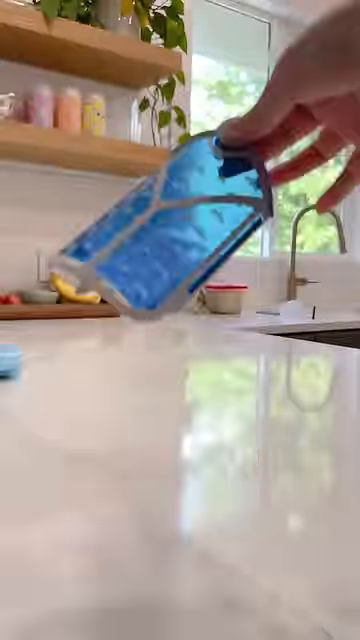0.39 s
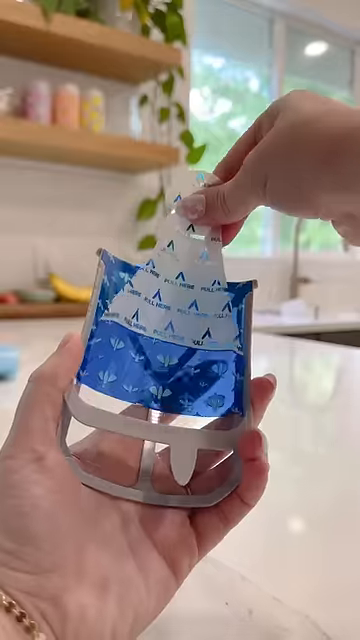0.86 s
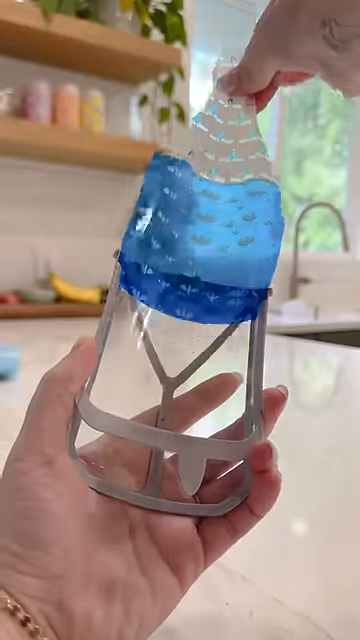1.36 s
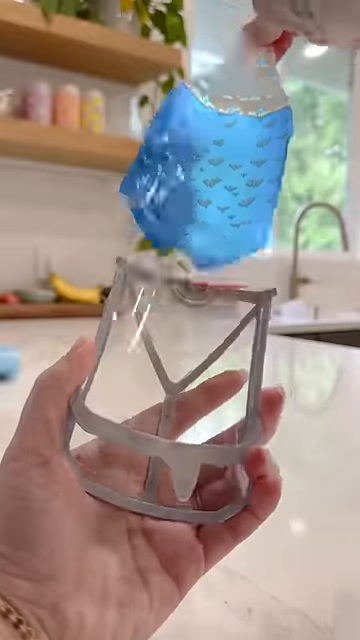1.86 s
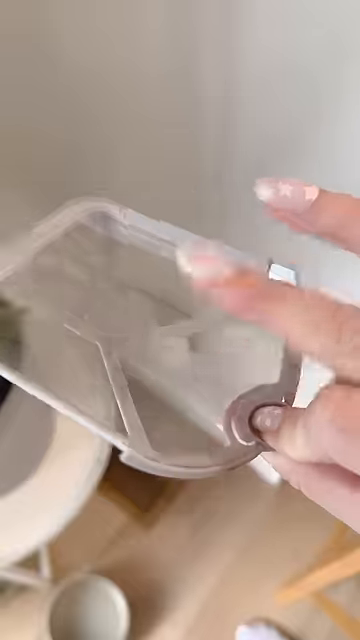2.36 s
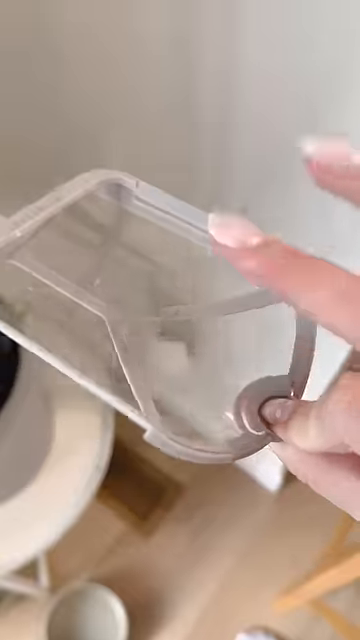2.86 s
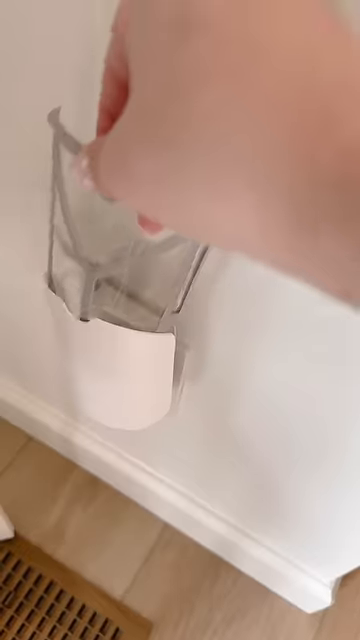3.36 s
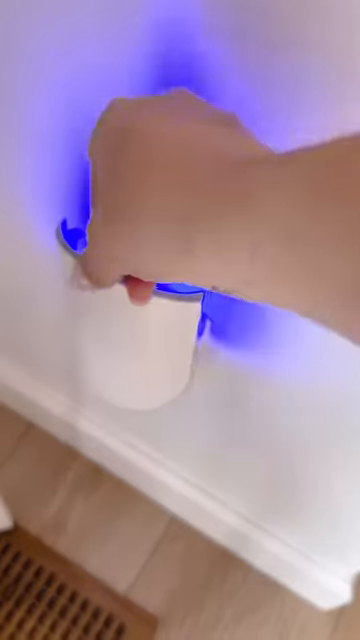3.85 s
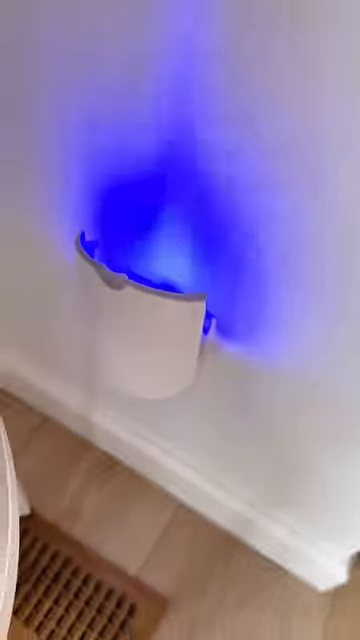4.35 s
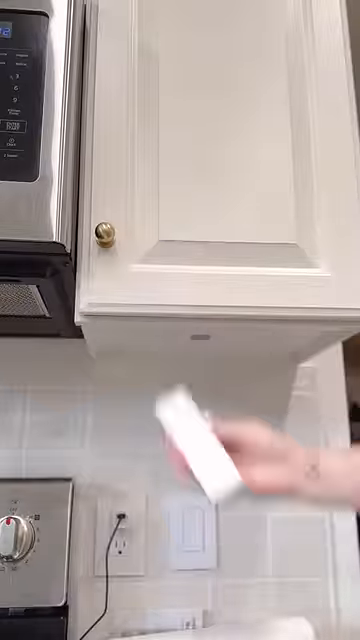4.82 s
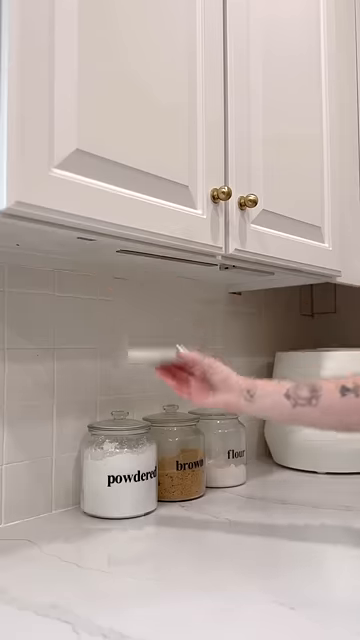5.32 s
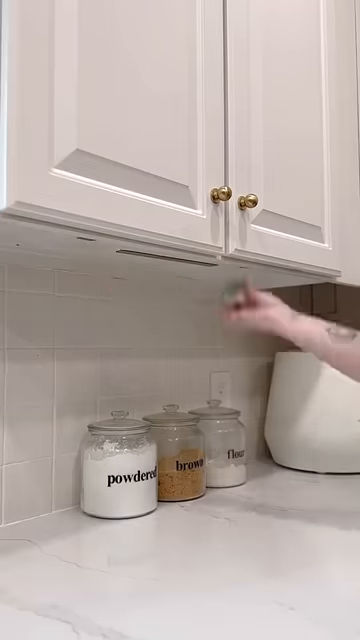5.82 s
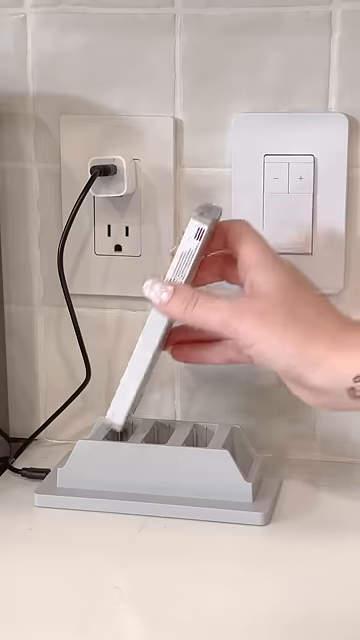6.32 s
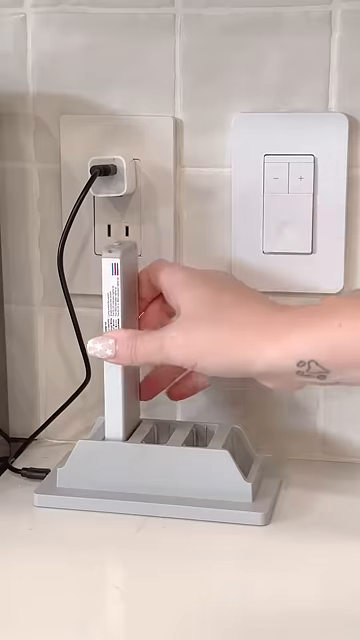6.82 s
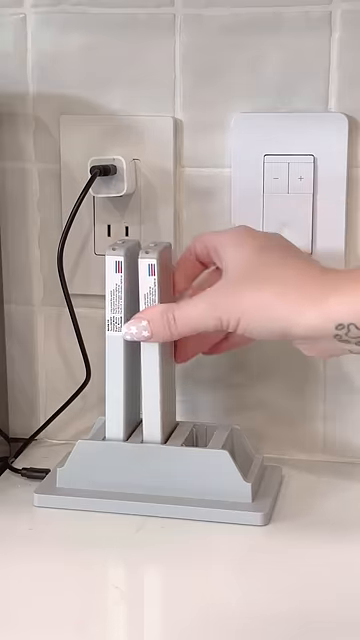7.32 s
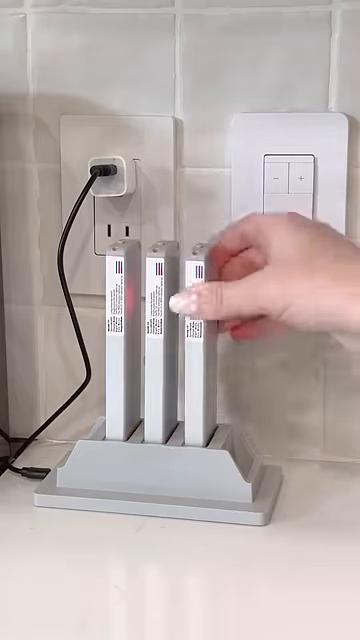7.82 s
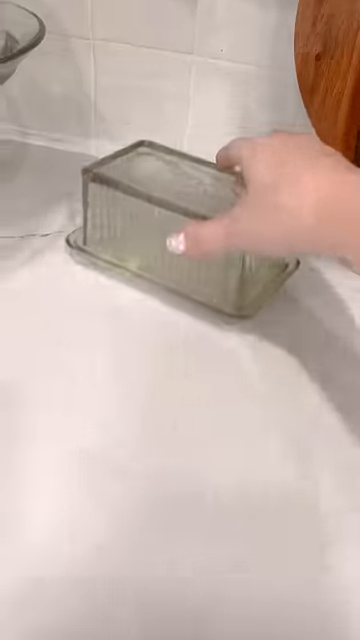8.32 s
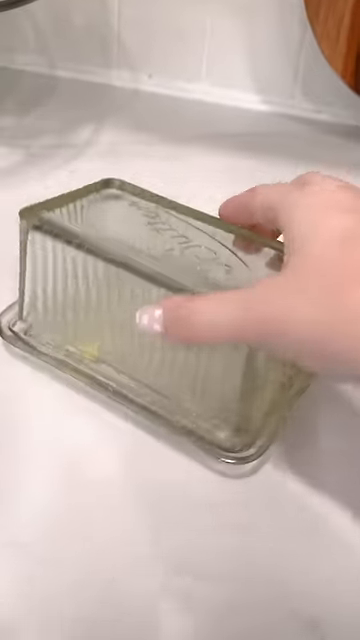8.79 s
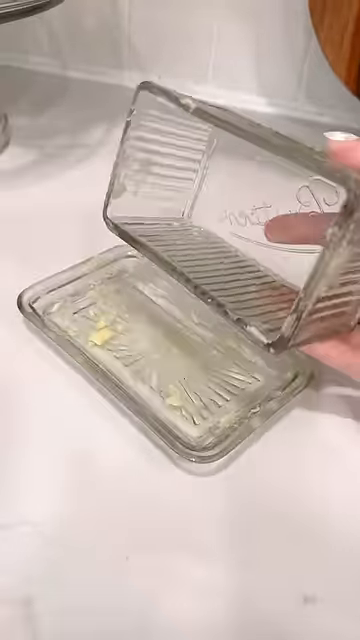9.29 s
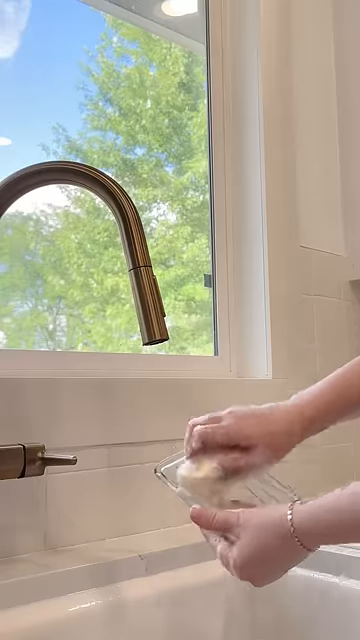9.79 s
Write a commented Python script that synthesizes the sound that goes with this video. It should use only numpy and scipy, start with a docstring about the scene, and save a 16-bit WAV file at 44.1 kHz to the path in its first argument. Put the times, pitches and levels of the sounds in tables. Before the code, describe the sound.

Close-miked in a hard-walled kitchen over quiet fridge hum and air that shift with each cut. A plastic tray rubs out of a card box, sticky film peels with crackles and snaps, and nails tap twice. The tray scrapes and squeaks into a wall holder. Bars snap off magnets, then click into a hollow ringing dock. A glass dish drags over stone and knocks, its lid clinks brightly, and a wet sponge rubs softly.

```python
"""Kitchen chores heard close by in short shots, over a fridge hum and air whose pitch follows each shot's speed.
A plastic tray slides out of a carton, its sticky film is peeled off, nails tap it and it slides into a wall holder.
Light bars are pulled off their magnets, two faint steady tones sound, and bars click into a hollow dock; a glass dish
drags over stone, knocks and its lid clinks; last, a wet sponge wipes. Contacts are noise bursts with ringing modes,
strokes are coloured noise full of tiny slips, squeaks are sines that mostly glide; hard walls answer with a wash."""
import sys
import numpy as np
from scipy import signal
from scipy.fft import rfft, irfft, next_fast_len
from scipy.io import wavfile
from scipy.ndimage import uniform_filter1d, map_coordinates

SR = 44100
rng = np.random.default_rng(int(sys.argv[2]) if len(sys.argv) > 2 else 0)


def level_to_linear(level):
    """Convert decibel levels to linear amplitude factors, elementwise."""
    exponent = np.asarray(level, float) / 20
    return 10 ** exponent


def transcribe(u):
    """Save the signal u as a 16-bit wav file named by the first command-line argument.

    u: samples, shape (n,) or (channels, n), limited to [-1, 1]; the rate is SR.
    q: integer samples, one column per channel.
    """
    v = np.clip(np.atleast_2d(u).T, -1, 1)
    q = np.round(v * 32767).astype(np.int16)
    wavfile.write(sys.argv[1], SR, q)


N = 437472
T = np.arange(N) / SR


def unit(x):
    """Scales a sound to rms 1."""
    return x / np.sqrt(np.mean(x ** 2) + 1e-20)


def along(points, hz):
    """Reads a curve of (frequency [Hz], value) points on a log frequency axis."""
    f, v = np.transpose(points)
    return np.interp(np.log(hz + 1), np.log(f + 1), v)


def filtered(x, response):
    """Multiplies the spectrum of x by a complex response of frequency."""
    m = next_fast_len(x.shape[-1] + 8192)
    spectrum = rfft(x, m) * response(np.fft.rfftfreq(m, 1 / SR))
    return irfft(spectrum, m)[..., :x.shape[-1]]


def causal(points):
    """Minimum-phase response of a spectrum: nothing sounds before the blow."""
    def response(hz):
        cepstrum = irfft(np.log(level_to_linear(np.maximum(along(points, hz), -90))))
        half = len(cepstrum) // 2
        cepstrum[1:half] *= 2
        cepstrum[half + 1:] = 0
        return np.exp(rfft(cepstrum))
    return response


def thud_body_edge(x):
    """Splits a sound into thud, body and edge; the three add up to the whole."""
    def band(hz, kind):
        return signal.sosfilt(signal.butter(2, hz, kind, fs=SR, output="sos"), x)
    thud, edge = band(700, "low"), band(4500, "high")
    return thud, x - thud - edge, edge


def wobble(rate):
    """A smooth random curve with rate knots a second."""
    return map_coordinates(rng.standard_normal(int(N * rate / SR) + 4), [T * rate])


def wavering(x, patchy_db):
    """The contact patch wanders, so narrow bands swell and fade for a moment."""
    z = signal.stft(x, nperseg=1024)[2]
    field = uniform_filter1d(rng.standard_normal(z.shape), size=4, axis=0)
    field = uniform_filter1d(field, size=5, axis=1)
    return signal.istft(z * level_to_linear(patchy_db * unit(field)), nperseg=1024)[1][:N]


def swells(rows, rise_db, fall_db, bend):
    """Level curves of short strokes, up and down; bend over 1 rounds the top, under 1 sharpens it."""
    u = np.linspace(0, 1, 8)

    def away(top, far, db, drop_db):
        return np.transpose([top + (far - top) * u, db - drop_db * u ** abs(bend)])

    return [np.vstack([away(top, start, db, rise_db)[::-1], away(top, end, db, fall_db)[1:]])
            for start, top, end, db in rows]


RISE_SHARE, SLOWEST_RISE_S = .08, .0015  # rise time as a share of contact length, and its limit


def strikes(hits, crack, modes, thud_db, ring_db, soft=0):
    """Each contact is a short coloured rattle; its weight thuds and rings the modes at new random strengths.
    soft: dB of thud gained for each dB of edge lost."""
    out, t = np.zeros(N + SR), np.arange(SR // 3) / SR
    s, db, weight, edge, length = np.transpose(hits)[:, :, None]
    hold_and_stop = level_to_linear(-60 * (t / np.maximum(length, .002)) ** 1.324)
    rise = 1 - np.exp(-t / np.clip(RISE_SHARE * length, .0001, SLOWEST_RISE_S))
    chatter = hold_and_stop * rise
    rattle = filtered(rng.standard_normal(chatter.shape) * chatter, causal(crack))
    # each band is brought to peak 1
    low, body, high = [x / np.abs(x).max(1, keepdims=True) for x in thud_body_edge(rattle)]
    sound = body + level_to_linear(weight + thud_db - soft * edge) * low + level_to_linear(edge) * high
    strength = rng.normal(0, 1.0, (len(s), len(modes)))
    for k, (hz, level, t60) in enumerate(modes):
        fade = level_to_linear(weight + ring_db + level + strength[:, k, None] - 60 * t / t60)
        build_up = 1 - np.exp(-t * hz / 1.3)  # within a cycle or so
        sound += fade * np.sin(2 * np.pi * hz * t) * build_up
    for at, row in zip(np.round(s[:, 0] * SR).astype(int), level_to_linear(db) * sound):
        out[at:at + len(t)] += row
    return out[:N]


USUAL_DB = -45  # pressure at which a stroke has its usual colour


def rubbing(strokes, colour, peaks, peak_db, slips, slip_db, rough_db, thud, edge):
    """Tiny slips of uneven size, slips a second, over a scrape in the rubbed thing's colour.
    thud and edge are (dB over the body, dB more per dB of pressure)."""
    size = level_to_linear(slip_db + rng.normal(0, 1.4, N)) * (rng.random(N) < slips / SR)
    scrape = wavering(rng.standard_normal(N), patchy_db=3.0)
    grit = scrape * (1 + 40 * uniform_filter1d(size, size=40)) * level_to_linear(rough_db * wobble(82))

    def coloured(f):
        ringing = 1 + sum(level_to_linear(peak_db + db) * 1j * f * w / (c * c - f * f + 1j * f * w) for c, w, db in peaks)
        return level_to_linear(along(colour, f)) * ringing

    bands = thud_body_edge(filtered(grit, coloured))
    # the loudest stroke at each moment sets the pressure; no sound outside strokes
    db = np.max([np.interp(T, *np.transpose(stroke), -200, -200) for stroke in strokes], 0)
    tilts = [db + over_db + grows * (db - USUAL_DB) for over_db, grows in (thud, (0, 0), edge)]
    gains = uniform_filter1d((db > -150) * level_to_linear(tilts), size=60)
    return sum(gain * unit(band) for gain, band in zip(gains, bands))


# shots: (start [s], playback speed [ratio], hum, 2nd and 3rd harmonic [dB before the lift], rumble [dB], hiss [dB])
SHOTS = [(0, 1, -62, -61.5, -66, -55.5, -68), (.455, 1.5, -58, -69, -65, -59, -70.5),
         (2.095, 1, -54, -65, -69, -57, -68.5), (4.401, 1, -62, -61.5, -65.5, -59.5, -66.5),
         (5.05, 1, -50, -65, -62, -59, -69.5), (6.27, 1.05, -60, -62.5, -65, -59.5, -68),
         (8.119, 1, -50.5, -59, -65.5, -58.5, -69.5), (9.585, .7, -52, -87, -58.5, -55, -66)]
HUM_HZ, HUM_LIFT_DB = 68.5, 1.5  # pitch at speed 1; lift of hum and side tones
# fridge side tones: (frequency at speed 1 [Hz], level before the lift [dB])
SIDE_TONES = [(167, -68.5), (829, -76), (9170, -96)]
# relative colour of the low and the high air noise: (frequency at speed 1 [Hz], level [dB per Hz])
RUMBLE = [(30, -48), (60, 2), (130, 3), (250, -7), (500, -10), (850, -18.5), (1000, -40.5), (1300, -71.5)]
HISS = [(500, -27.5), (1000, -6.5), (1700, -8), (3000, 2.5), (4500, -10), (7000, -15.5), (10000, -21),
        (16000, -40)]
# stereo width of the walls' answer, also the base of the air's: (frequency [Hz], side minus mid [dB])
WIDTH = [(100, -29), (400, -11.5), (1200, -1), (4000, -20), (12000, -3.5)]


def room_tone():
    """Fridge hum of unsteady sines and stereo air noise; a shot's playback speed shifts every pitch."""
    out = np.zeros((2, N))
    ends = [row[0] for row in SHOTS[1:]] + [N / SR]
    for (start, speed, *hum_db, rumble_db, hiss_db), end in zip(SHOTS, ends):
        cut = slice(round(start * SR), round(end * SR))
        t = T[cut]
        tones = [(HUM_HZ * (k + 1), db) for k, db in enumerate(hum_db)] + SIDE_TONES
        hum = np.zeros(len(t))
        for hz, db in tones:
            level = level_to_linear(db + HUM_LIFT_DB + 1.4 * wobble(11)[cut])
            hum += level * np.sin(2 * np.pi * (hz * speed * t + rng.random()))

        def noise(shape):
            white = rng.standard_normal(len(t))
            return unit(filtered(white, lambda hz: level_to_linear(along(shape, hz / speed))))

        def air():
            return level_to_linear(rumble_db) * noise(RUMBLE) + level_to_linear(hiss_db) * noise(HISS)

        mid = hum + air()
        side = filtered(air(), lambda hz: level_to_linear(along(WIDTH, hz) + 2.5))
        fade = np.clip(np.minimum(t - start, end - t) / 0.0046, 0, 1)  # softens the cut a little
        out[:, cut] = fade * np.array([mid + side, mid - side])
    return out


# how long the kitchen lingers: (frequency [Hz], t60 [s])
LINGER = [(150, 0.063), (1000, 0.38), (4000, 0.35), (12000, .3)]
# strength of the walls' answer: (frequency [Hz], level [dB])
WALLS = [(150, -20.5), (500, -13.5), (1500, -15), (5000, -16), (14000, -15)]


def kitchen(x):
    """Hard walls answer: the energy of each band lingers as a diffuse wash and dies at its own speed."""
    hz, t, z = signal.stft(x, SR, nperseg=256, noverlap=192)
    power = uniform_filter1d(np.abs(z) ** 2, size=3, axis=0)
    keep = level_to_linear(-120 * t[1] / along(LINGER, hz))  # share of energy left after one frame
    wash = np.array([signal.lfilter([0, 0, 1 - k], [1, -k], row) for k, row in zip(keep, power)])
    noise = signal.stft(rng.standard_normal((2, N)), SR, nperseg=256, noverlap=192)[2]
    noise = noise / np.sqrt(np.mean(np.abs(noise) ** 2))
    shaped = noise * np.sqrt(np.abs(wash)) * level_to_linear(along(WALLS, hz))[:, None]
    shaped[1] *= level_to_linear(along(WIDTH, hz))[:, None]  # the ports hear the bass alike
    mid, side = signal.istft(shaped, SR, nperseg=256, noverlap=192)[1][:, :N]
    return np.array([mid + side, mid - side])


# squeaks, then two steady tones: (start [s], end [s], first pitch [Hz], last pitch [Hz], peak [dB])
SQUEAKS_AND_TONES = [(3.57, 3.71, 3080, 3520, -33), (3.49, 3.66, 2450, 2800, -45),
                     (3.47, 3.58, 3500, 4300, -43), (4.5, 4.62, 615, 600, -57),
                     (4.54, 4.63, 2640, 2520, -60), (4.89, 5.06, 1560, 1560, -64),
                     (4.93, 5.05, 4000, 4000, -72)]
SQUEAK_EDGE_DB, SQUEAK_FLAT = 48, 4.3  # drop at both ends; higher holds longer
SMOOTH_DB, ROUGH_DB = -70, -48  # faint ones are clean, loud ones rough


def squeaks_and_tones():
    """Brief squeaks, most gliding, likely plastic; the last two are faint steady tones, perhaps a whine or chime."""
    out = np.zeros(N)
    for start, end, hz, last_hz, db in SQUEAKS_AND_TONES:
        u = np.clip((T - start) / (end - start), 0, 1)
        smear = np.clip((db - SMOOTH_DB) / (ROUGH_DB - SMOOTH_DB), 0, 1)
        pitch = (hz + (last_hz - hz) * u) * (1 + .03 * smear * wobble(190))
        tone = np.sin(2 * np.pi * np.cumsum(pitch) / SR) * (1 + .55 * smear * wobble(140))
        level = level_to_linear(db - SQUEAK_EDGE_DB * abs(2 * u - 1) ** SQUEAK_FLAT)
        out += (u > 0) * (u < 1) * level * tone
    return out


# sponge strokes, one curve each: (time [s], level [dB])
WIPE = [
    [(9.585, -72.5), (9.639, -52), (9.667, -66.5), (9.746, -62), (9.758, -59), (9.896, -50), (9.92, -56)],
]
# colour of the wiping: (frequency [Hz], level [dB per Hz])
SINK = [(120, -34), (200, 3), (500, -24), (548, -16.5), (612, 14.5), (1230, 19), (8270, -12),
        (16000, -42.5)]


def sponge():
    """A wet sponge wipes: sparse slips in a soft rub."""
    return rubbing(WIPE, SINK, [], peak_db=0, slips=30, slip_db=3.5, rough_db=1.0,
                   thud=(-13, -.05), edge=(-6, .1))


# strokes of the tray leaving the carton: (start [s], strongest [s], end [s], peak [dB])
CARTON = [(0, .05, .082, -32.5), (.085, .108, .15, -31.5), (.16, .17, .26, -58), (.26, .274, .314, -57),
          (.314, .344, 0.36, -62)]
# plastic on card: (frequency [Hz], level [dB per Hz])
CARD = [(120, -47.5), (200, -21), (387, -21), (867, -16), (1180, -3.5), (1740, -6), (5230, -20),
        (10300, -31), (16000, -49)]
# box resonances under the rub: (frequency [Hz], width [Hz], level [dB])
BOX = [(1180, 140, 0.5), (5200, 270, -21.5)]
# carton drop: (time [s], body peak [dB], weight [dB], edge over body [dB], length [s])
CARTON_DROP = [(0.271, -40.5, 5.6, -8, 0.0052)]
# ring of the empty box: (frequency [Hz], level [dB], t60 [s])
EMPTY_BOX = [(168, 6.5, 0.056), (258, -4, 0.037), (1205, -1.5, 0.045)]
# colour of a contact with the tray: (frequency [Hz], level [dB per Hz])
TRAY_CRACK = [(59, -54), (100, -15.5), (595, -13.5), (1080, -3.5), (2040, -3), (2580, -3.5), (3620, -4.5),
              (4470, -8.5), (6020, -12), (12000, -21), (14000, -48)]


def carton():
    """Plastic rubs on card in short swells, and the empty box drops with a dull ring."""
    rub = rubbing(swells(CARTON, 12, 12.7, 1.34), CARD, BOX, peak_db=-0.5, slips=200, slip_db=-2,
                  rough_db=-0.7, thud=(-3, -.25), edge=(-6, .05))
    return rub + strikes(CARTON_DROP, TRAY_CRACK, EMPTY_BOX, thud_db=4.5, ring_db=5.0)


# strokes of the tray into the holder, one curve each: (time [s], level [dB])
SLIDE = [
    [(3.29, -73), (3.304, -50.5), (3.394, -37.5), (3.41, -44.5), (3.45, -38), (3.478, -39), (3.492, -32.5),
     (3.6, -34), (3.676, -31.5), (3.688, -25), (3.702, -37), (3.724, -55), (3.76, -66)],
    [(3.788, -40), (3.798, -42), (3.812, -34.5), (3.834, -54), (3.9, -86)],
]
# holder resonances under the slide: (frequency [Hz], width [Hz], level [dB])
HOLDER = [(240, 31, 10.5), (1170, 104, 5.5), (2740, 250, -8), (3420, 1160, 3), (5700, 180, -15)]
# knocks on the way in: (time [s], body peak [dB], weight [dB], edge over body [dB], length [s])
KNOCKS = [(3.302, -36, -27, -20, 0.015), (3.341, -33, -16, -20, 0.028), (3.389, -29, -26, -17, 0.018),
          (3.477, -26.5, -7.5, -11, 0.025), (3.508, -30, -27, -20, 0.016), (3.526, -25.5, -7, -8, 0.031),
          (3.668, -29, -28, -17, 0.02), (3.683, -22, -3.5, 2, 0.018), (3.795, -23.5, -19, -13.5, 0.011),
          (3.811, -17, -7, 2, 0.013), (3.825, -37.5, 1, -13, 0.02), (3.998, -55.5, -3, 6.5, 0.021)]
# hollow ring of the knocks: (frequency [Hz], level [dB], t60 [s])
HOLLOW = [(145, 2, 0.081), (233, 3, 0.088), (1105, 1.1, 0.029)]


def holder_slide():
    """The tray scrapes into the wall holder, exciting its resonances, and knocks hollowly."""
    slide = rubbing(SLIDE, TRAY_CRACK, HOLDER, peak_db=3.5, slips=120, slip_db=2.0, rough_db=0.5,
                    thud=(-8, -.45), edge=(-5, -.05))
    return slide + strikes(KNOCKS, TRAY_CRACK, HOLLOW, thud_db=-17, ring_db=-2)


# drag strokes, one curve each: (time [s], level [dB])
DRAG = [
    [(8.12, -63.5), (8.234, -48), (8.314, -43), (8.386, -42.5), (8.408, -44), (8.434, -42), (8.608, -51.5),
     (8.72, -61.5), (8.756, -66), (8.768, -49)],
    [(8.86, -60), (8.892, -78), (8.914, -34.5)],
]
# glass on stone: (frequency [Hz], level [dB per Hz])
STONE = [(120, -45.5), (200, -10), (236, -23), (500, -4), (883, -9), (3070, -18), (10300, -22),
         (13800, -28.5), (16000, -71.5)]
# dish resonances under the drag: (frequency [Hz], width [Hz], level [dB])
DISH = [(511, 52, -9), (2090, 170, -0.5), (3135, 510, 0), (5600, 290, -9.5)]
# base knocks: (time [s], body peak [dB], weight [dB], edge over body [dB], length [s])
DISH_HITS = [(8.4, -30, -1.5, -8, 0.041), (8.773, -14.5, -9, -10, 0.0314), (8.92, -13, -10.5, 0.5, 0.037)]
# colour of a knock: (frequency [Hz], level [dB per Hz])
GLASS_CRACK = [(100, -22), (300, -12), (600, 0), (1100, -2), (2100, -5), (3800, -10), (6500, -22),
               (12000, -34), (16000, -70)]
# ring of the thick base: (frequency [Hz], level [dB], t60 [s])
BASE = [(140, -6, .1), (522, 0, .11), (850, -6, .04), (1098, -16, .12), (2070, -10, .11), (2837, -18, .1),
        (3750, -14, .12)]


def dish():
    """Glass scrapes over stone and its thick base knocks."""
    drag = rubbing(DRAG, STONE, DISH, peak_db=12, slips=370, slip_db=-15.5, rough_db=1.0,
                   thud=(-6, -.15), edge=(-2, .05))
    return drag + strikes(DISH_HITS, GLASS_CRACK, BASE, thud_db=-2.5, ring_db=-0.5)


# lid clink: (time [s], body peak [dB], weight [dB], edge over body [dB], length [s])
LID_HITS = [(8.918, -9.5, -7.5, -2, 0.025)]
# colour of the clink: (frequency [Hz], level [dB per Hz])
LID_CRACK = [(120, -55), (200, -26.5), (933, -0.5), (2610, -6.5), (2910, -10.5), (4270, -11), (4680, 0.5),
             (9580, -29), (14300, -45), (16000, -80)]
# ring of the glass: (frequency [Hz], level [dB], t60 [s])
GLASS = [(1658, -20, .22), (2837, 0, .22), (4070, -19, .15), (5080, -23, .3), (5437, -7, .12),
         (6401, -12, .1), (11460, -32, .13)]


def lid():
    """The glass lid clinks: almost no thud, a clear ring of high modes."""
    return strikes(LID_HITS, LID_CRACK, GLASS, thud_db=-33, ring_db=-0.7)


# peeling strokes, one curve each: (time [s], level [dB])
PEEL = [
    [(.455, -54), (.53, -41.5), (.54, -49), (.66, -81.5), (.675, -47), (.784, -84.5), (.83, -60.5)],
    [(.835, -53), (.865, -39), (.92, -40), (1.0, -46.5), (1.032, -42), (1.1, -45), (1.205, -45.5),
     (1.275, -49), (1.35, -47.5), (1.505, -43), (1.59, -59)],
    [(1.7, -69), (1.855, -46), (1.9, -70.5), (2.09, -69.5)],
]
# rushes of glue: (start [s], strongest [s], end [s], peak [dB])
RIP = [(1.205, 1.247, 1.296, -24), (1.348, 1.364, 1.396, -27), (1.503, 1.514, 1.54, -23.5),
       (1.515, 1.538, 1.571, -26.5)]
# film snaps: (time [s], body peak [dB], weight [dB], edge over body [dB], length [s])
FILM_SNAPS = [(.462, -32, -20, -19.5, .026), (.474, -27, -16, -6.5, .025), (.49, -34, -22, 8.5, 0.0061),
              (.502, -25, -24, 3, 0.016), (.528, -40, -8, -7, .01), (.559, -27.5, -9, -2.5, .004),
              (.573, -31, -12, -2, .006), (.676, -14, -10, 0.5, .01), (.694, -15.5, -30, 6, .011),
              (.703, -16.5, -4, 5.5, 0.015), (.857, -25.5, -5, 8.5, .008), (.883, -31.5, -9, 11, .01),
              (.908, -22, -8.5, 8, .02), (.928, -33, -9, -6, .02), (.993, -29.5, -9, 7, 0.0083),
              (1.003, -36.5, -9, 2, .011), (1.031, -35, -19, 10.5, 0.01), (1.049, -25, -26, 7, 0.0084),
              (1.064, -23.5, -23, 4.5, 0.007), (1.097, -35, -20, 9, 0.0086),
              (1.126, -26.5, -18, -4, 0.0095), (1.198, -35.5, -21, 5.5, .011), (1.212, -26, -11, 5, .01),
              (1.252, -15, -3.5, 4, 0.0086), (1.372, -16.5, -0.5, -1, .008),
              (1.402, -35.5, -10, 6.5, 0.011), (1.421, -29, -9.5, 10.5, 0.0047),
              (1.438, -38, -17, 9.5, .01), (1.447, -28.5, -1, -2.5, 0.011), (1.472, -33.5, 1, -2, .011),
              (1.489, -25.5, -2, -5, 0.0081), (1.594, -27, -22, -10, 0.0039),
              (1.639, -34, -21, -28, 0.0068), (1.76, -19, -27.5, 9, 0.0053), (1.767, -30, -22, 4, .006),
              (1.804, -28, -9, -5, .007), (1.824, -39, -15, 8, 0.0087), (1.838, -27.5, -14, 7, 0.0075),
              (1.847, -20.5, -18, -11.5, .01), (1.861, -21, -21, 4, .01), (1.866, -18, -25, 4, 0.065),
              (1.87, -12, -15, 3.5, 0.021), (1.993, -44, -12, 12.5, .01)]
# colour of the film: (frequency [Hz], level [dB per Hz])
FILM_CRACK = [(59, -49), (100, -15.5), (310, -9), (392, -8.5), (829, -4.5), (3320, -10.5), (5100, -7.5),
              (10300, -16), (13900, -10.5), (16500, -8)]
# ring of the tray: (frequency [Hz], level [dB], t60 [s])
TRAY = [(231, -4, .06), (360, -3, .05), (545, 0, .04), (760, -3, .025), (3600, -4, .015)]


def film():
    """Sticky film peels in many slips, rips where the glue lets go in a rush, and snaps with the tray's ring."""
    peel = rubbing(PEEL, FILM_CRACK, [], peak_db=0, slips=470, slip_db=0.0, rough_db=-3.0,
                   thud=(-8, -.25), edge=(1.8, .02))
    rip = rubbing(swells(RIP, 12, 24, 1.9), FILM_CRACK, [], peak_db=0, slips=870, slip_db=-6, rough_db=3.5,
                  thud=(-4, -.1), edge=(1.5, -.1))
    return peel + rip + strikes(FILM_SNAPS, FILM_CRACK, TRAY, thud_db=-3.0, ring_db=-8.5, soft=.1)


# hand on the bars: (start [s], strongest [s], end [s], peak [dB])
GROPE = [(4.4, 4.544, 4.69, -48), (4.64, 4.655, 6.1, -50), (4.69, 4.726, 4.76, -32),
         (5.05, 5.09, 5.2, -51.5), (5.66, 5.732, 5.9, -38)]
# bars snapping off: (time [s], body peak [dB], weight [dB], edge over body [dB], length [s])
BAR_HITS = [(4.648, -32, -15, -28, 0.022), (4.718, -23, -19, -18, 0.025), (4.73, -20, -16.5, -3, 0.029),
            (4.753, -23, -21, -12, 0.031), (5.083, -53, -4, -17, 0.038), (5.725, -27.5, -20, -5.5, 0.057),
            (5.771, -28, -26, -24, 0.061)]
# colour of the bars: (frequency [Hz], level [dB per Hz])
BAR_CRACK = [(59, -48), (100, -31), (524, -11), (1100, -10.5), (1520, -2), (2420, -6.5), (4770, -11),
             (7450, -27.5), (10000, -18.5), (16000, -43)]
# ring of a bar: (frequency [Hz], level [dB], t60 [s])
BAR = [(600, -2, 0.035), (1582, 4, 0.1), (2140, -12, 0.09), (3500, -6, .08), (4300, -4, 0.09)]


def light_bars():
    """A hand gropes for the bars and pulls them off their magnets with ringing snaps."""
    hand = rubbing(swells(GROPE, 17.3, 31, 0.5), BAR_CRACK, [], peak_db=0, slips=120, slip_db=-3.5,
                   rough_db=-0.2, thud=(-5, -.15), edge=(-9, .15))
    return hand + strikes(BAR_HITS, BAR_CRACK, BAR, thud_db=5, ring_db=0.5)


# fingers brushing the tray: (start [s], strongest [s], end [s], peak [dB])
REACH = [(2.295, 2.316, 2.319, -43), (2.69, 2.76, 2.765, -47)]
# nail taps: (time [s], body peak [dB], weight [dB], edge over body [dB], length [s])
NAIL_TAPS = [(2.319, -3, -14, -13, 0.0067), (2.322, -5.5, -6, -11, .014), (2.585, -58, 6, 5, 0.016),
             (2.766, -2, -12.5, -10, .006), (2.768, -4, -8, -7, .013)]
# colour of a tap: (frequency [Hz], level [dB per Hz])
TAP_CRACK = [(59, -50), (100, -20), (595, 1), (1080, -12), (2040, -4), (2580, -12), (3620, -4),
             (4470, -11.5), (6020, -14.5), (12900, -27.5), (16000, -46.5)]


def nail_taps():
    """Fingers brush the tray before a tap, then nails crack on it and ring its modes."""
    reach = rubbing(swells(REACH, 37, 3, .9), TRAY_CRACK, [], peak_db=0, slips=100, slip_db=-2.5,
                    rough_db=0.0, thud=(-14, -.1), edge=(8, .6))
    return reach + strikes(NAIL_TAPS, TAP_CRACK, TRAY, thud_db=-0.3, ring_db=-12)


# nudges of the bars: (start [s], strongest [s], end [s], peak [dB])
NUDGE = [(6.47, 6.55, 6.6, -52), (6.64, 6.702, 6.706, -34.5), (6.9, 6.906, 7.0, -32.5),
         (7.05, 7.217, 7.221, -38), (7.415, 7.42, 7.5, -45.5), (7.6, 7.69, 7.72, -43),
         (7.74, 7.802, 7.806, -34.5), (7.98, 7.99, 8.07, -51)]
# resonances of the dock's slots under a nudge: (frequency [Hz], width [Hz], level [dB])
SLOT = [(1125, 270, -14.5), (2060, 210, 1.5), (3330, 350, -2.5)]
# a seated bar rocks as the hand lets go: (time [s], body peak [dB], weight [dB], edge over body [dB], length [s])
SLOT_TICKS = [(6.924, -36, -12, -6, .014), (6.933, -31, -16, 0.5, 0.015), (6.954, -34.5, -11, -2, 0.026),
              (7.421, -32, -15, 1.5, 0.018), (7.431, -42, -15, 8, 0.017), (7.449, -37, -10, 6.5, 0.029),
              (7.475, -38.5, -10, -2, .013), (7.992, -36, -15, 2, .02), (8.002, -30.5, -15.5, -1, 0.027),
              (8.024, -37.5, -9, -5, 0.035)]
# ring of a slot: (frequency [Hz], level [dB], t60 [s])
SLOT_RING = [(1090, -20, .03), (2044, 0.5, 0.037), (2660, -2, 0.033), (3370, 3, 0.033)]
# clicks into the dock: (time [s], body peak [dB], weight [dB], edge over body [dB], length [s])
DOCK_HITS = [(6.487, -28.5, -14.5, -24.5, 0.049), (6.511, -30.5, -4.5, -38.5, 0.044),
             (6.539, -17.5, -22, -33, 0.028), (6.616, -36, -8.5, -35.5, 0.029),
             (6.654, -25.5, -10.5, -25, 0.033), (6.708, -0.5, -20, -6.5, 0.023),
             (6.714, -12, -3.5, -10, 0.019), (7.064, -22, -10, -24.5, 0.036),
             (7.123, -25, -16.5, -41, 0.043), (7.159, -21, -20, -27, 0.024),
             (7.226, -5.5, -12.5, -10, 0.02), (7.344, -39, -2, -11, 0.029), (7.598, -11, -23, -22, 0.023),
             (7.628, -15.5, -26.5, -22, 0.027), (7.641, -21, -13, -22, 0.042), (7.653, -8, -14.5, -16, .01),
             (7.669, -13.5, -13.5, -19, 0.02), (7.754, -16, -23, -14, 0.025),
             (7.786, -29.5, -11, -7.5, 0.046), (7.81, -6.5, -11, -3.5, 0.015)]
# colour of the dock: (frequency [Hz], level [dB per Hz])
DOCK_CRACK = [(59, -34), (100, -27.5), (335, -3), (1080, 0.5), (1680, -3), (2000, -6), (3120, -6.5),
              (6150, -29), (6700, -26.5), (11600, -26), (16000, -40.5)]
# ring of the hollow dock: (frequency [Hz], level [dB], t60 [s])
DOCK = [(221.4, 1, 0.23), (233.6, -6, 0.33), (280, -6, 0.15), (559.3, -5, 0.12), (844, -10, .08),
        (1140, -7, 0.1), (1420, -13.5, .16), (1800, -17.5, .15), (3558, -17.5, .12)]


def dock():
    """Bars are nudged and pushed into the hollow plastic dock, which rings low; seated bars tick in their slots."""
    nudge = rubbing(swells(NUDGE, 21, 8, 1.0), DOCK_CRACK, SLOT, peak_db=1, slips=420, slip_db=6,
                    rough_db=-1.5, thud=(-4, -.4), edge=(-7, .1))
    ticks = strikes(SLOT_TICKS, DOCK_CRACK, SLOT_RING, thud_db=-1.5, ring_db=6.5)
    clicks = strikes(DOCK_HITS, DOCK_CRACK, DOCK, thud_db=-14, ring_db=-6.5, soft=0.66)
    return nudge + ticks + clicks


# strength of the walls' answer from each time on: (time [s], level [dB])
NEAR_WALL = [(0, 3), (.455, -1), (2.095, -3), (3.29, -4), (4.4, 7), (6.27, 2), (8.12, 2)]


def scene():
    """Everything near, in front of the phone; the lid's pure ring stirs the room less."""
    near = squeaks_and_tones() + sponge() + carton() + holder_slide() + dish()
    near = near + film() + light_bars() + nail_taps() + dock()
    clink = lid()
    start, wall_db = np.transpose(NEAR_WALL)
    wall_gain = level_to_linear(wall_db[np.searchsorted(start, T, "right") - 1])
    sent = (near + level_to_linear(-8.5) * clink) * wall_gain
    return near + clink + kitchen(sent) + room_tone()


def top_cut(x):
    """Nothing passes above the cut-off."""
    return signal.sosfilt(signal.butter(12, 16960, fs=SR, output="sos"), x)


# phase difference between the ports: (frequency [Hz], side minus mid before a 5.5 dB cut [dB])
PORTS = [(60, -32), (180, -35.5), (350, -27), (700, -14), (1400, -13), (2800, -21), (6000, -4), (14000, 2)]
# strength of that difference, one value for each shot: (level [dB])
OFF_AXIS_DB = [.1, .1, .1, .1, .1, .1, .1, 0.082]


def record(dry):
    """Two ports a little apart hear the treble with different phase; the microphone gives out below 50 Hz
    and near 16 kHz, and its bass trails."""
    shot = np.searchsorted([row[0] for row in SHOTS], T, "right") - 1
    quarter_turn = filtered(dry.mean(0), lambda hz: -1j * level_to_linear(along(PORTS, hz) - 5.5))
    lag = level_to_linear(OFF_AXIS_DB)[shot] * quarter_turn
    # microphone range: (frequency [Hz], level [dB])
    span = [(20, -14), (48, 0), (15300, 0), (16100, -16), (16900, -24), (17200, -90)]
    both = filtered(dry + np.array([lag, -lag]), lambda hz: level_to_linear(along(span, hz)))
    # each frequency is delayed by 1.1 / (60 + Hz) seconds
    both = filtered(both, lambda hz: np.exp(-2j * np.pi * 1.1 * np.log1p(hz / 60)))
    return top_cut(both)


dry = scene()
out = record(dry)
transcribe(out)
```